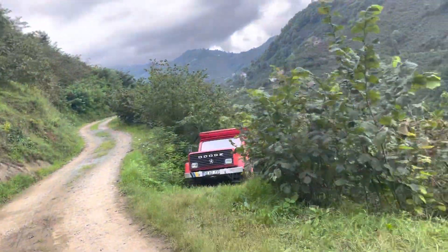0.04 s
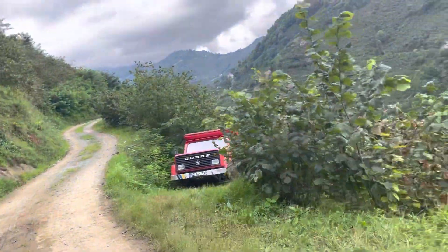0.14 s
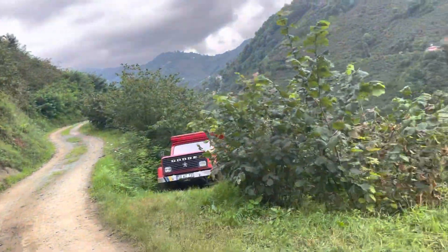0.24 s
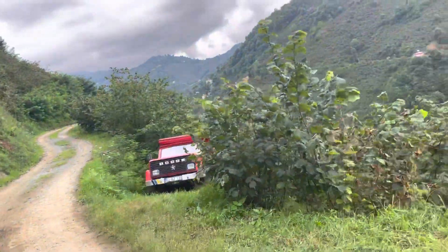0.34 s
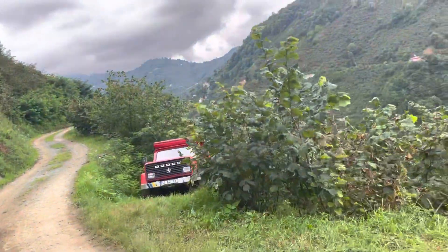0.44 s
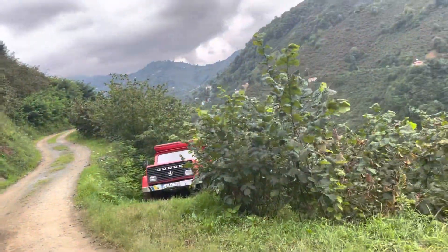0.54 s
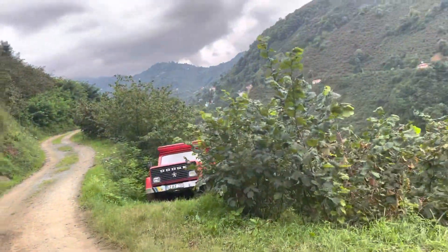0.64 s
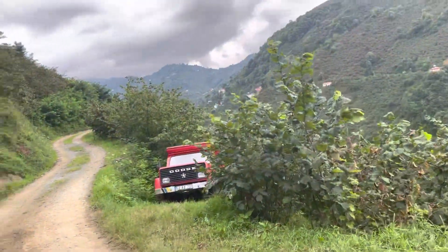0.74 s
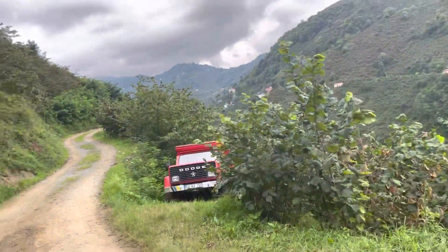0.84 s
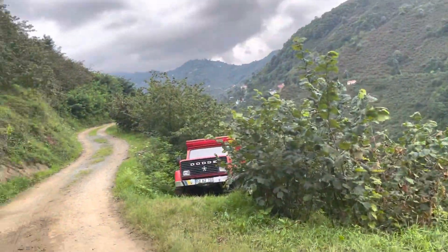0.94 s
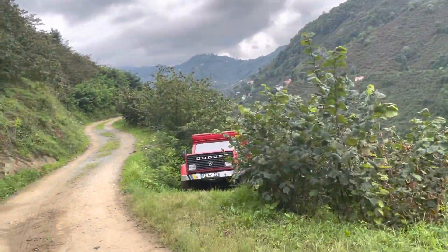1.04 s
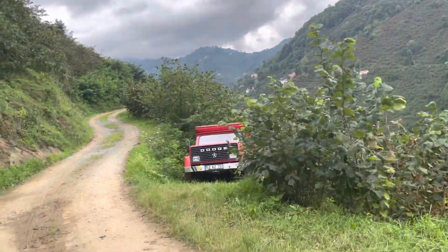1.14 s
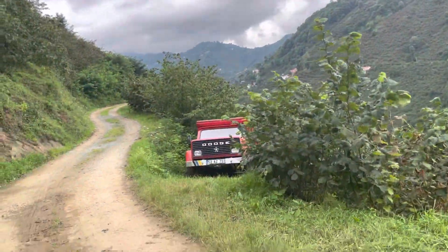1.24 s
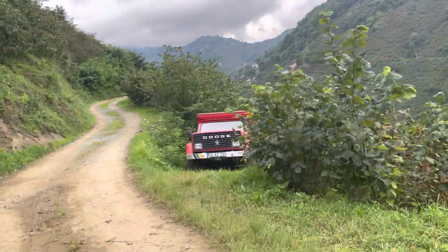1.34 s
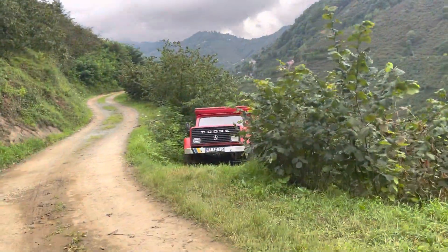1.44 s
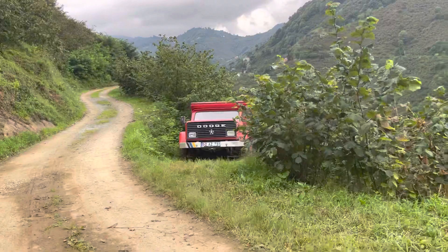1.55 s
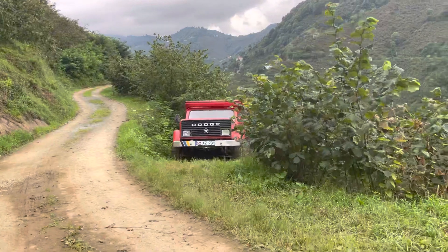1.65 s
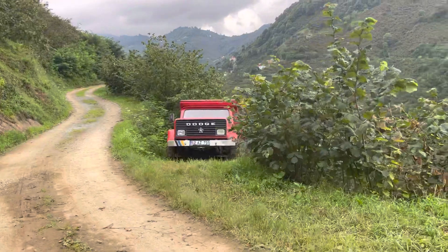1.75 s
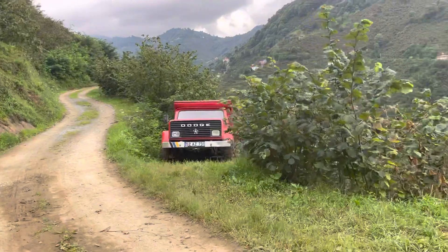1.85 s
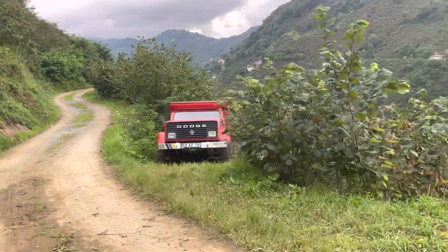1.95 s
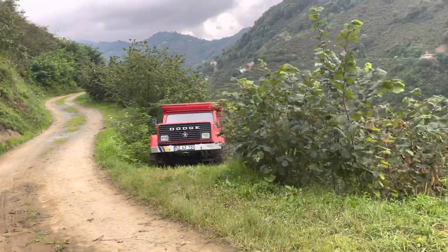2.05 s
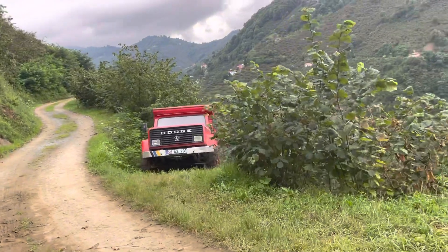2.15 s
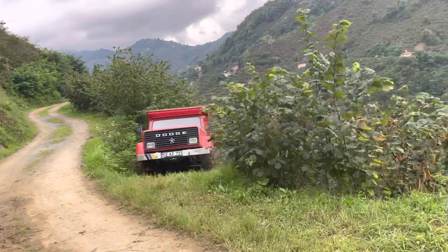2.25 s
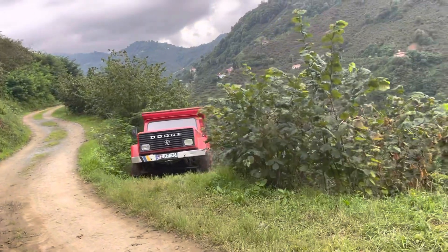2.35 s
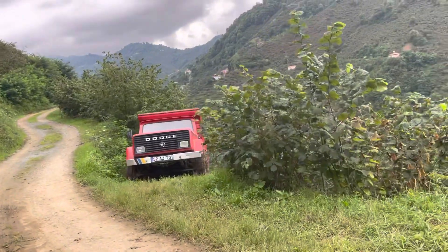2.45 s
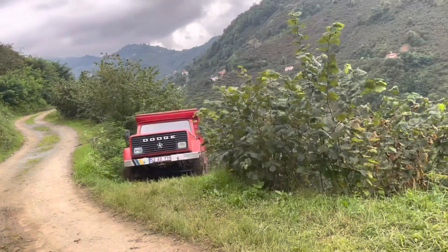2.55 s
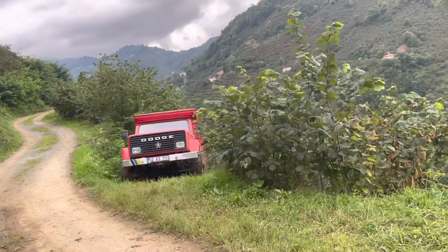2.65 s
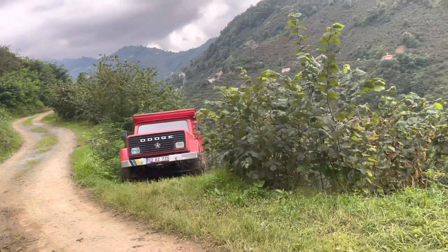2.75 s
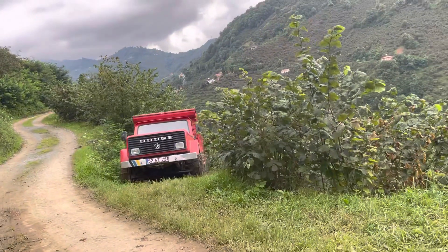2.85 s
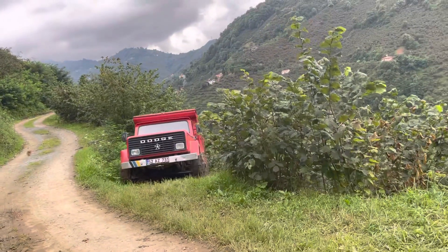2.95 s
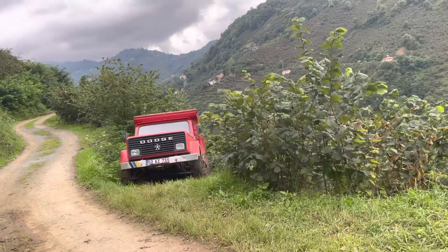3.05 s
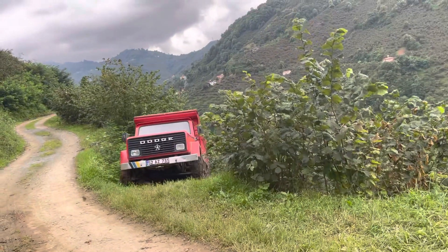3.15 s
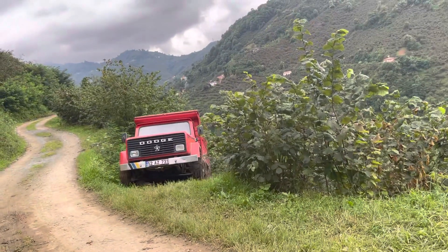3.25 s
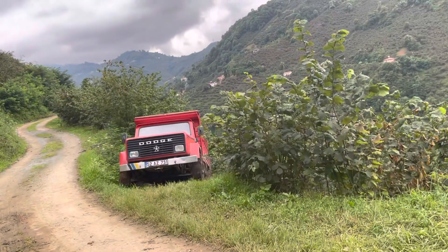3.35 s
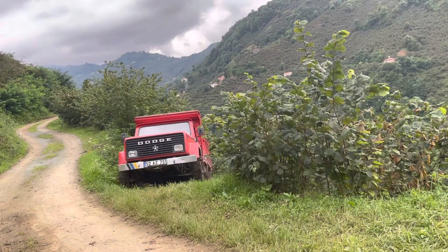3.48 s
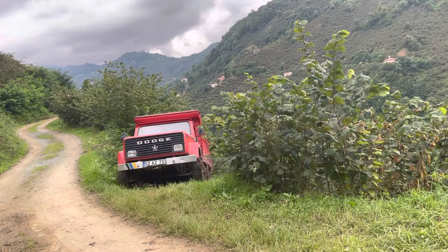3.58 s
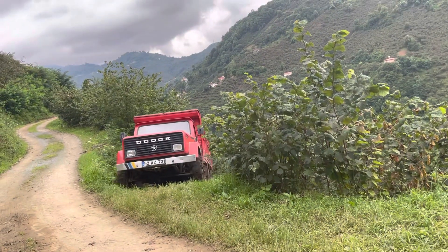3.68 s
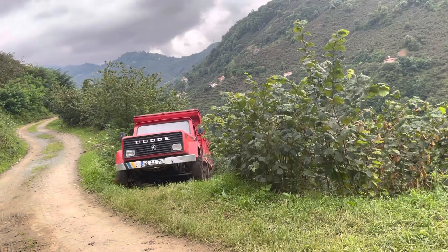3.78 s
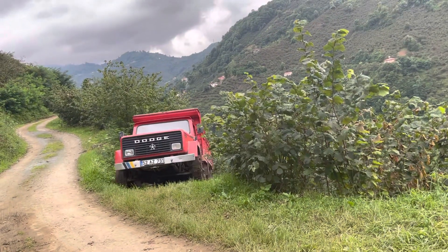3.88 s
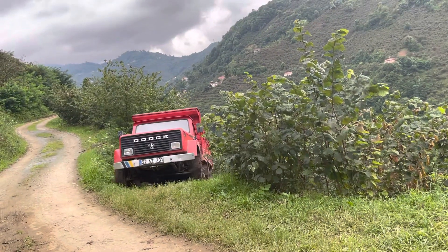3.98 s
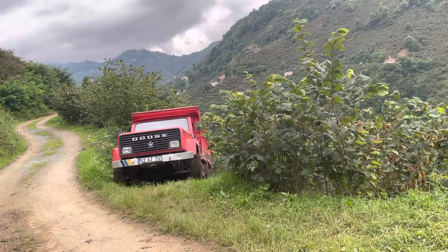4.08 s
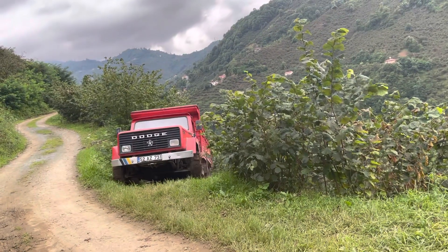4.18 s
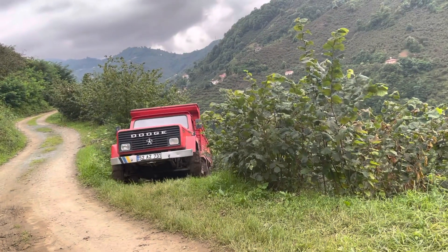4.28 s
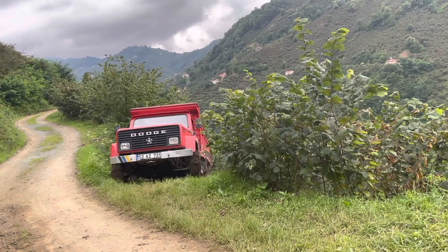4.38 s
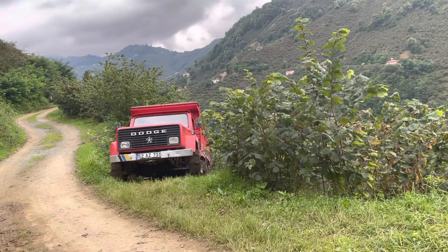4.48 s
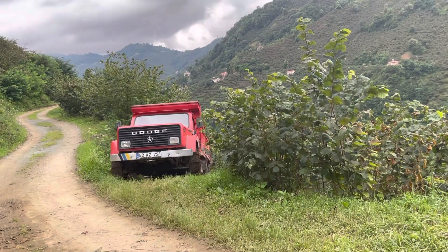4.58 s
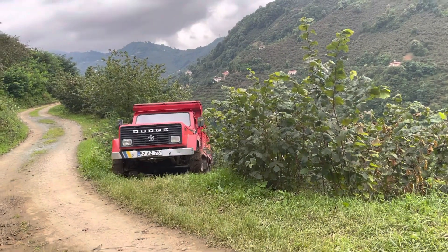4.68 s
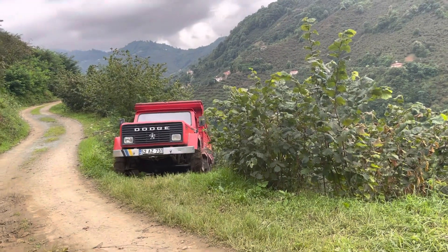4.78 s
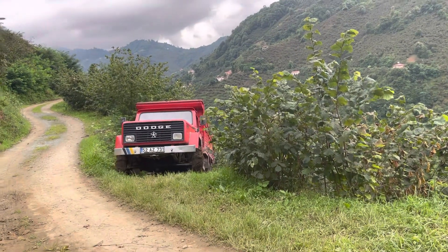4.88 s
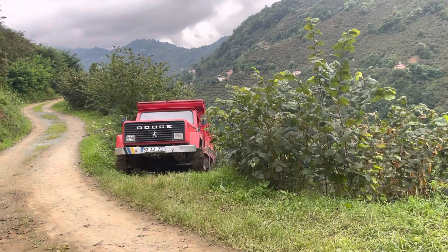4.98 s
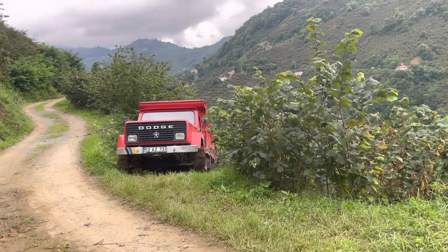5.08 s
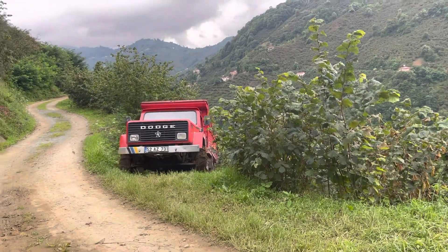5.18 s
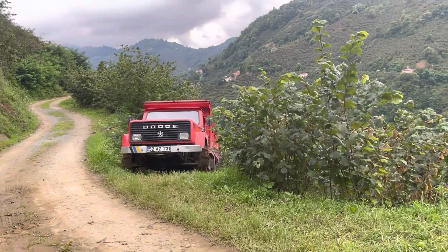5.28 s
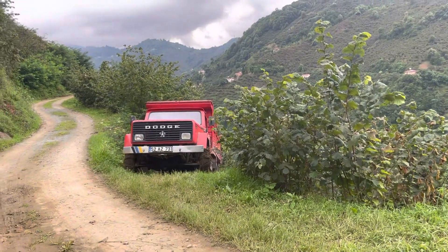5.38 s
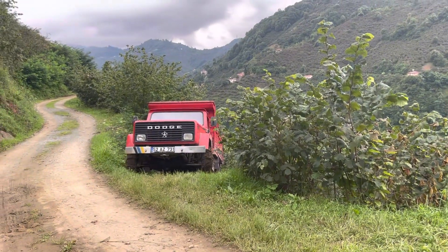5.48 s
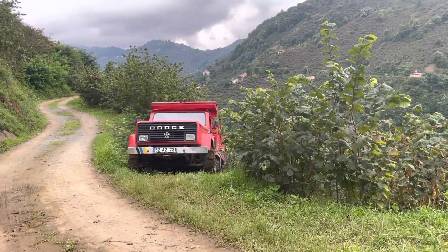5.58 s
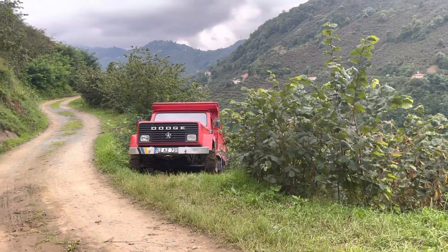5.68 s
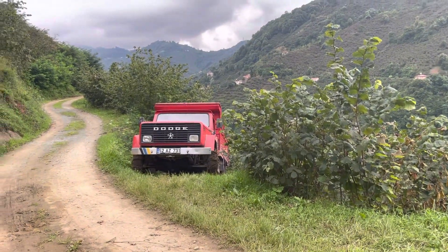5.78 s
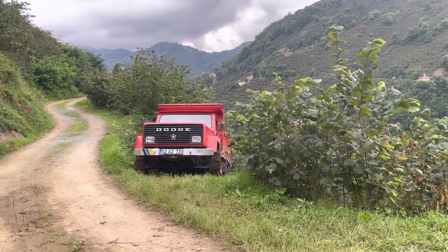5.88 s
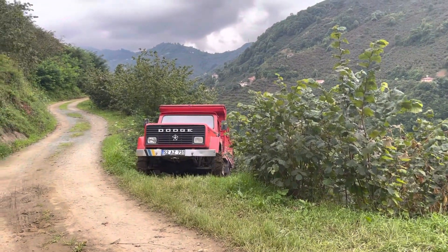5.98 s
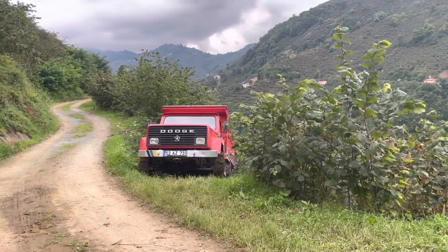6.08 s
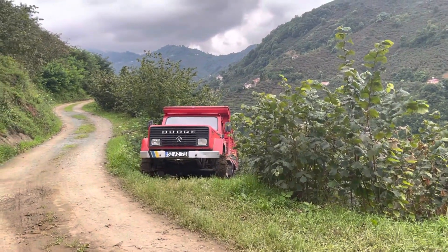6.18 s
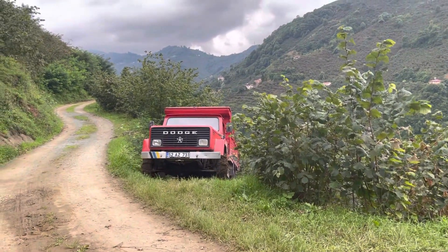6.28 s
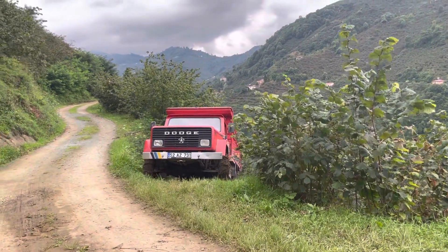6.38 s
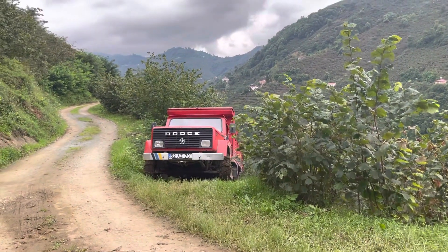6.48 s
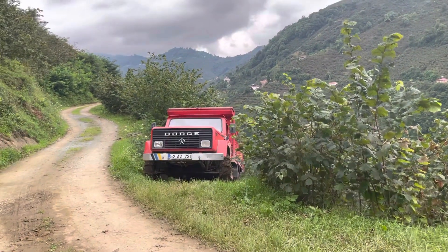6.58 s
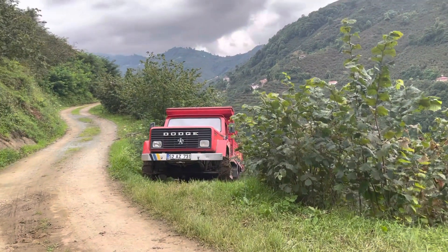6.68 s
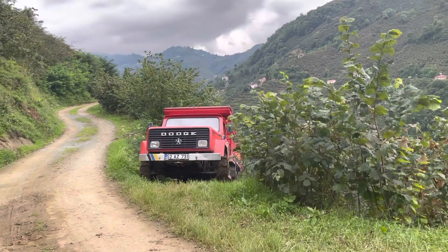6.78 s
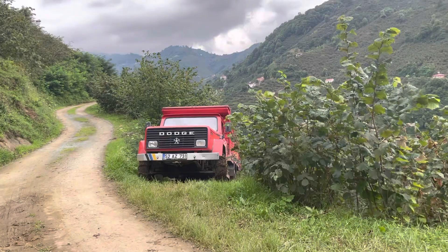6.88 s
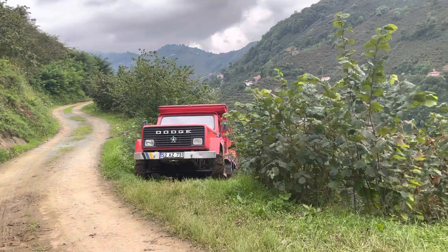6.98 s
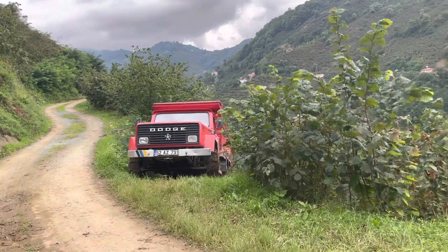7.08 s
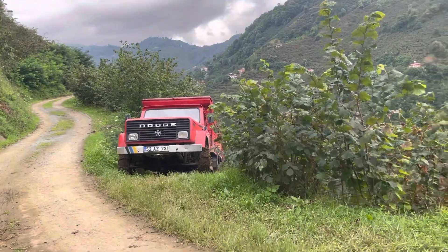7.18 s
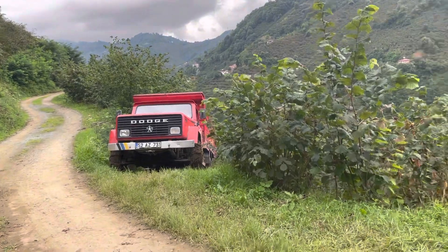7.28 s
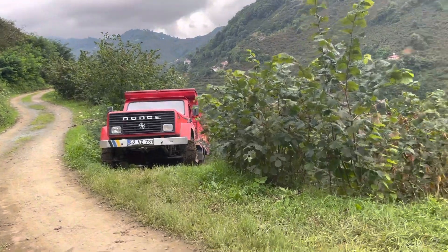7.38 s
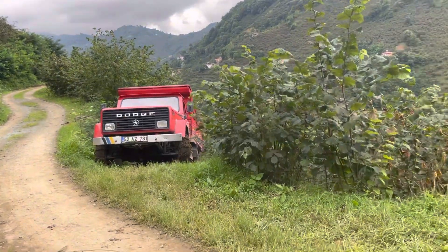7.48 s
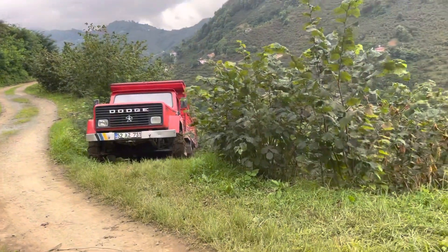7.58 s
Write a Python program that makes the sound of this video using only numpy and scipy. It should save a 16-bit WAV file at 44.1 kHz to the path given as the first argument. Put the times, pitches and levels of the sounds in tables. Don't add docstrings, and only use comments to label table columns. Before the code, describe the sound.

An open-air stereo phone capture, a few metres from an old four-cylinder diesel truck labouring up a grassy slope. From 0 s the engine roars at full pull: booming low exhaust, block rumble, droning panels, valve rattle and turbulent fan hiss. Pitch falls quickly at first, then more slowly, to about half by 4 s. Around 1.2 s there are light steel clanks, a short squeak and a sharp air puff. At 2.2-2.6 s a twig snaps and the chassis thuds repeatedly. At 3.5 s comes a hard metallic bang with a brief plate ring. The combustion knocks grow more distinct as it lugs. Near 4.4 s the engine drops sharply and almost stalls, with clanks, bumps and small squeaks, then recovers by 4.6 s. A quieter, steady, knocking idle continues to 7.6 s, fan hiss slowly fading, with a very faint air puff near the end.

```python
import sys
import numpy as np
from scipy import signal
from scipy.fft import rfft, irfft, next_fast_len
from scipy.io import wavfile
from scipy.ndimage import uniform_filter1d

SR = 44100
rng = np.random.default_rng(int(sys.argv[2]) if len(sys.argv) > 2 else 0)


def to_linear_factor(level_db):
    exponent = np.asarray(level_db, float) / 20
    return 10 ** exponent


def dump_mix(stems):
    frames = np.atleast_2d(stems).T
    limited = np.clip(frames, -1, 1)
    pcm = np.round(limited * 32767).astype(np.int16)
    wavfile.write(sys.argv[1], SR, pcm)


N = 336483


def unit(x):
    return x / np.sqrt(np.mean(x ** 2))


def curves(table):
    s, *columns = np.transpose(table)
    return [np.interp(np.arange(N) / SR, s, c) for c in columns]


def colour(x, points):
    hz, db = np.transpose(points)
    size = next_fast_len(N)
    f = np.maximum(np.fft.rfftfreq(size, 1 / SR), 1)
    gain = to_linear_factor(np.interp(np.log(f), np.log(hz), db, left=-60, right=-60))
    return irfft(rfft(x, size) * gain, size)[:, :N]


def colour_short(x, hz):
    band = signal.butter(2, [hz * 0.58, hz * 1.4], "bandpass", fs=SR, output="sos")
    return unit(signal.sosfilt(band, x))


def ring(x, hz, t60):
    r, w = np.exp(-np.log(1000) / (t60 * SR)), 2 * np.pi * hz / SR
    return signal.lfilter([0, np.sin(w)], [1, -2 * r * np.cos(w), r * r], x)


def noise():
    return rng.standard_normal((2, N))


def walk(rate):
    levels = np.interp(np.arange(N) * rate / SR, np.arange(2000), rng.standard_normal(2000))
    return uniform_filter1d(levels, int(SR / rate / 2))


def add(track, s, sound):
    i = int(s * SR)
    track[:, i:i + sound.shape[-1]] += sound[..., :N - i]


def idling():
    declutch_s = 4.35
    return np.clip((np.arange(N) / SR - declutch_s) / .1 + .5, 0, 1)


def settle(pull_db, idle_db, eases_s, tau_s):
    after = np.maximum(np.arange(N) / SR - eases_s, 0)
    return idle_db + (pull_db - idle_db) * np.exp(-after / max(tau_s, .02))


def struck(since, late):
    return np.diff((since > late) * 1., prepend=1) > 0


# start in seconds, peak in dB, centre in Hz, length in seconds.
THUDS = [(1.685, -23, 364.4, 0.025), (2.269, -25.5, 480, 0.064), (2.304, -15.5, 620, 0.018),
         (2.321, -21, 353, 0.011), (2.424, -23, 210, 0.028), (2.474, -21.5, 335, 0.037),
         (2.516, -17, 505, 0.038), (2.552, -34, 638, 0.034), (3.49, -14, 360, 0.041),
         (3.536, -16.5, 198, 0.022), (4.008, -24, 242, 0.022), (4.48, -21.5, 560, 0.017),
         (4.994, -31, 470, 0.041), (4.438, -24, 150, .05), (4.6, -28, 150, 0.072)]
# start in seconds, peak in dB, pitch in Hz.
TWIG_SNAPS = [
    (2.243, -6.5, 1580),
]


def thuds():
    out = np.zeros((2, N))
    t = np.arange(SR // 5) / SR
    for s, db, hz, length in THUDS:
        shape = (t / length) * np.exp(1 - 3 * t / length) * 3
        bump = colour_short(rng.standard_normal((2, len(t))), hz)
        add(out, s, to_linear_factor(db - 5.5) * shape * bump)
    for s, db, hz in TWIG_SNAPS:
        pulse = np.exp(-((t - .0012) / 0.00064) ** 2) * np.sin(2 * np.pi * hz * t)
        add(out, s, to_linear_factor(db) * pulse * np.ones((2, 1)))
    return out


# start in seconds, peak in dB, crack in dB, tail in seconds.
CLANKS = [(1.1694, -19.5, -32, 0.061), (1.199, -16.5, -24.5, 0.015), (2.436, -31, -4, 0.015),
          (2.7123, -25, -10, 0.03), (3.2197, -24, -7, 0.018), (3.4896, -0.5, -21, 0.039),
          (3.622, -22, -12, 0.11), (3.8228, -22.5, -28, 0.018), (4.103, -17, -14.5, 0.091),
          (4.264, -16.5, -16, 0.078), (4.4374, -25, -5.5, 0.024), (4.5965, -15.5, -30, 0.075),
          (4.8045, -27, -15, 0.09)]


def steel_cracks():
    low, high = np.zeros((2, 2, N))
    t = np.arange(SR // 8) / SR
    for s, db, crack_db, tail in CLANKS:
        decay = 0.7 * np.exp(-t / 0.0094) + .5 * np.exp(-t / max(tail, .004))
        shape = (1 - np.exp(-t / 0.00024)) * decay
        add(low, s, to_linear_factor(db - 17.5) * shape * rng.standard_normal((2, len(t))))
        add(high, s, to_linear_factor(db + crack_db) * shape * rng.standard_normal((2, len(t))))
    body = colour(low, [(500, -6), (1800, 10.5), (4000, 5.0), (7500, -8)])
    return body + colour(high, [(5000, -10), (8000, 1), (12000, 5), (13800, -15)])


# frequency in Hz, level in dB, 60 dB decay in seconds.
PLATE_MODES = [(2300, -3, .06), (2490, -7, .24), (3400, 0, .19), (3455, -4, .17), (4170, -9, .14),
               (5216, -2, .09)]
# start in seconds, blow in dB.
STRIKES = [
    (3.488, -45),
    (3.498, -23),
]


def steel_plates():
    blow = np.zeros((2, N))
    for s, db in STRIKES:
        add(blow, s, to_linear_factor(db) * np.ones((2, 1)))
    return sum(to_linear_factor(db) * ring(blow, f, t60) for f, db, t60 in PLATE_MODES)


# start in seconds, start in Hz, end in Hz, length in seconds, level in dB.
SQUEAKS = [
    (1.21, 3400, 3390, 0.055, -41),
    (3.204, 2810, 2860, 0.056, -40),
    (3.62, 3330, 3420, 0.074, -39),
    (4.077, 3050, 3330, 0.037, -38),
    (4.108, 3480, 3480, 0.027, -36),
    (4.595, 2200, 2230, .03, -41),
    (5.643, 6300, 6340, 0.042, -50),
]


def squeaks():
    out = np.zeros((2, N))
    t = np.arange(SR // 8) / SR
    for s, start_hz, end_hz, length, db in SQUEAKS:
        part = np.clip(t / length, 0, 1)
        chatter = 1 + 0.59 * unit(uniform_filter1d(rng.standard_normal((2, len(t))), size=80))
        angle = 2 * np.pi * np.cumsum(start_hz + (end_hz - start_hz) * part) / SR
        add(out, s, to_linear_factor(db) * np.sqrt(np.abs(np.sin(np.pi * part))) * chatter * np.sin(angle))
    return out


# centre in seconds,
# level in dB, length in seconds.
PUFFS = [
    (1.206, -38, .04),
    (7.464, -53, .12),
]
# frequency in Hz, level in dB per Hz.
PUFF_SPECTRUM = [(2500, -12), (4200, -7), (5600, -8), (11000, -6), (13800, -22)]


def air_puffs():
    t = np.arange(N) / SR
    puffs = sum(to_linear_factor(db) * np.exp(-((t - s) / length) ** 2) for s, db, length in PUFFS)
    return puffs * unit(colour(noise(), PUFF_SPECTRUM))


# frequency in Hz, level in dB per Hz.
FAN_SPECTRUM = [(1500, -3), (4000, -25), (5600, -12.5), (6700, 5), (7500, 1), (9000, 2), (11500, 1),
                (12600, -7), (13800, -7)]


def fan(knock, hz):
    level_db = settle(pull_db=-52.5, idle_db=-81.5, eases_s=3.5, tau_s=4.8) + 0.1459 * (hz - 31)
    flutter_db = 8.5 + 2.6 * walk(25) + 1.84 * walk(11.0)
    return to_linear_factor(level_db + flutter_db) * unit(colour(noise() * (1 + 2.0 * knock), FAN_SPECTRUM))


# frequency in Hz, level in dB per Hz.
RUMBLE_SPECTRUM = [(40, 5), (100, 0), (200, 0.5), (330, -1.5), (500, -5.5), (800, -11), (1200, -23),
                   (2000, -28)]


def rumble(turns, revs):
    level_db = settle(pull_db=-31.5, idle_db=-40.5, eases_s=4.5, tau_s=0.58) + 0.1464 * revs
    throb = 1 + 0.043 * np.cos(2 * np.pi * (turns - .15))
    roar = unit(colour(noise() * throb * to_linear_factor(0.88 * walk(18)), RUMBLE_SPECTRUM))
    return to_linear_factor(level_db - 1.64) * roar


# frequency in Hz, width in Hz, level in dB.
PANELS = [(398.8, 18, 4.5), (310, 20, -22), (704, 17, -13.5), (930, 17, -12), (2000, 280, -12),
          (2420, 190, -15.5)]


def panel_drone(firing, since, revs):
    full_hz = 18.7
    level_db = settle(pull_db=-40.5, idle_db=-49.5, eases_s=4.1, tau_s=.1) + 0.6023 * np.minimum(revs, full_hz)
    chance = rng.standard_normal((700, 2))
    late = .002 + .00022 * np.clip(chance[firing, 0], -3, 3)
    kicks = unit(struck(since, late) * to_linear_factor(chance[firing, 1] + 9.4 * (firing % 2)))
    modes = [to_linear_factor(db) * unit(ring(kicks + f / 2200 * noise(), f, 2.2 / width)) for f, width, db in PANELS]
    return to_linear_factor(level_db - 2.0) * unit(sum(modes))


# frequency in Hz, level in dB per Hz.
GEAR_SPECTRUM = [(300, -3), (600, -4.5), (1300, -2.5), (1600, -0.5), (1850, -1), (2300, -5), (3000, -7.5),
                 (4200, -10), (4700, -13.5), (5600, -15.5), (6600, -17.5), (8000, -15.5), (12000, -23.5),
                 (13800, -38)]
# frequency in Hz, width in Hz, level in dB.
COVERS = [(724.5, 11, -12), (1423, 86, -9), (1244, 82, -19), (1634, 53, -11)]


def valve_gear():
    rattle = noise() * to_linear_factor(1.73 * walk(40))
    covers = sum(to_linear_factor(db) * unit(ring(rattle, f, 2.8 / width)) for f, width, db in COVERS)
    return unit(colour(rattle, GEAR_SPECTRUM)) + covers


# level in dB, in firing order.
CYLINDER_DB = [0, .9, -.7, 0]


def combustion(firing, since):
    size = to_linear_factor(.8 * rng.standard_normal(700)[firing] + np.array(CYLINDER_DB)[firing % 4])
    burst = unit(size * (1 - np.exp(-since / 0.005)) ** 2 * np.exp(-since / 0.0062))
    return size, burst


# frequency in Hz, level pulling in dB,
# level idling in dB, 60 dB decay in seconds.
BLOCK_MODES = [(694, 5.5, -5, 0.15), (1150, -28, -12.5, 0.028), (1394, 9.5, 6.5, 0.04),
               (2499, 4, -12.5, 0.05), (2956, -3, 0.5, 0.093), (3220, -2, -33, 0.025),
               (3480, -17, -1, 0.076), (3800, -15, -1.5, 0.05), (4175, -27, 4, 0.026),
               (5300, -24, -13, 0.034)]


def block_rings(firing, since, size, burst, hz):
    level_chance, sign_chance = rng.standard_normal((2, 700, len(BLOCK_MODES)))
    lug_db = .8 * np.maximum(26 - hz, 0)
    shake = struck(since, .005) * size + 0.097 * burst * noise()
    idle = idling() * (hz > 25)
    out = 0
    for k, (f, pull_db, idle_db, t60) in enumerate(BLOCK_MODES):
        level_db = pull_db + lug_db * (f > 2000) + idle * (idle_db - pull_db)
        level_db = level_db + 2.3 * level_chance[firing, k]
        out = out + ring(shake * to_linear_factor(level_db) * np.sign(sign_chance[firing, k]), f, t60)
    return unit(out)


# frequency in Hz, level in dB per Hz.
KNOCK_SPECTRUM = [(400, -2), (1200, 2.5), (1900, -2.5), (2500, -1), (3200, -0.5), (4200, -6.5), (4800, -9),
                  (5600, -13.5), (8000, -10.5), (12000, -16), (13800, -31)]
# time in seconds, level in dB.
NEAR = [(0, -0.5), (1, -3), (2.1, 0.5), (3.3, 1), (4.1, 0), (7.63, 2.5)]


def clatter(firing, since, hz, size, burst, share):
    near_db, = curves(NEAR)
    level_db = settle(pull_db=-33.5, idle_db=-37.5, eases_s=4, tau_s=0.42) + near_db
    knock = unit(colour(noise() * burst, KNOCK_SPECTRUM))
    knock = knock + 1.02 * block_rings(firing, since, size, burst, hz)
    return to_linear_factor(level_db + 1.0) * ((1 - share) * 1.085 * valve_gear() + share * knock)


# time in seconds, level in dB.
FUEL = [(0, 0), (.8, 0), (1.6, -0.5), (2.4, -0.5), (3.4, -0.5), (3.8, -5), (4.07, -2.5), (4.16, -3.5),
        (4.28, -6), (4.38, -38), (4.5, -5), (4.56, -2.5), (4.63, -15), (4.7, -7), (4.78, -11.5),
        (4.95, -11.5), (7.3, -11), (7.63, -10)]
# frequency in Hz, level in dB.
PIPE = [(20, -50), (40, -19.5), (56, 3.5), (72, -5), (88, -7), (106, -3.5), (135, -11), (170, -25.5)]
# level at full fuel in dB, share of the fuel change followed (0-1 or more),
# rise in dB per Hz of speed, extra at idle in dB.
ORDERS_DB = [(-17, 0.3, -0.07, 6), (-20.5, 1.33, 0.0033, 2.2), (-25, .5, -0.156, -5),
             (-28, 0.8, -2.7, -8.5)]
PULSE = [(1, -1.3, np.pi), (2, -1.4, .2), (3, 1.5, 1.3), (4, 2.5, -1.5)]
# multiple of the firing rate, level under order 3 in dB.
UPPER = [(5, -14), (6, -20), (7, -21.5), (9, -16)]


def exhaust(turns, hz):
    fuel_db, = curves(FUEL)
    pipe_hz, pipe_db = np.transpose(PIPE)
    free = idling()
    dbs = []
    for order, (db, follows, db_per_hz, idle_db) in enumerate(ORDERS_DB, 1):
        load_db = follows * fuel_db + db_per_hz * np.maximum(hz - 29, 0) + idle_db * free
        dbs.append(db + load_db + np.interp(np.log(order * hz), np.log(pipe_hz), pipe_db))
    out = 0
    for db, (k, pulling, idle) in zip(dbs, PULSE):
        slip = (k == 1) * .065 * (35 - hz)
        angle = k * 2 * np.pi * turns + (1 - free) * (pulling + slip) + free * idle
        out = out + to_linear_factor(db + .5 * k * walk(16)) * np.cos(angle + 0.11 * k * walk(18))
    for k, db in UPPER:
        out = out + to_linear_factor(dbs[2] + db + 5.1 * walk(12)) * np.cos(k * 2 * np.pi * turns + 0.87 * walk(7.6))
    return np.sqrt(2) * out


# time in seconds, rate in firings a second.
SPEED = [(0.0, 56.3), (0.45, 51.54), (0.89, 47.71), (1.54, 42.86), (1.68, 39.7), (1.94, 41.87),
         (2.26, 40.68), (2.51, 36.09), (2.72, 36.16), (2.84, 35.2), (3.44, 33.89), (3.64, 30.3),
         (4.03, 28.23), (4.35, 20.41), (4.52, 23.34), (4.6, 26.95), (5.64, 26.74), (7.63, 26.84)]


def scene():
    hz, = curves(SPEED)
    revs = hz - 27
    turns = np.cumsum(hz) / SR + .62
    fired = turns + .24 + .02 * np.maximum(revs, 0)
    firing = fired.astype(int)
    since = (fired - firing) / hz
    size, burst = combustion(firing, since)
    share = np.clip(0.47 - 0.013 * revs, 0, 1)
    out = thuds() + steel_cracks() + steel_plates() + squeaks()
    out = out + air_puffs() + fan(burst * share, hz)
    out = out + rumble(fired, revs) + panel_drone(firing, since, revs)
    return out + clatter(firing, since, hz, size, burst, share) + exhaust(turns, hz)


def gate_bands(ports):
    sums = [ports.sum(0) / 2, (ports[0] - ports[1]) / 2]
    f, s, (mid, side) = signal.stft(sums, SR, nperseg=2048, noverlap=1024)
    frames = mid.shape[1]
    held = np.cumsum(rng.random(frames) < .45)
    low = rng.choice([7400, 7700, 8300], frames, p=[.4, .5, .1])[held]
    high = rng.choice([8900, 9250, 9600], frames, p=[.2, .2, .6])[held]
    top = rng.choice([13100, 13500, 13850], frames, p=[.55, .3, .15])[held]
    slim = (s < 1.85) & (rng.random(frames)[held] < .45)
    low, high = np.where(slim, 8300, low), np.where(slim, 8900, high)
    shut = rng.random(frames) > .03
    treble = np.abs(mid[f > 9600]).mean(0) + 1e-9
    shut &= treble < to_linear_factor(4.6) * np.roll(treble, 1)
    f = f[:, None]
    mid = mid * ~((f > low) & (f < high) & shut | (f > top))
    side = side * (f < 12400)
    mid, side = signal.istft([mid, side], SR, nperseg=2048, noverlap=1024)[1][:, :N]
    return np.array([mid + side, mid - side])


def top_cut(x):
    return signal.sosfilt(signal.butter(12, 13870, fs=SR, output="sos"), x)


# frequency in Hz,
# lag of the right port in radians, likeness 0-1, left minus right in dB.
PORTS = [(0, 0, 1, -0.6), (150, 0.25, 0.95, -0.2), (427, 0.69, 1, -0.5), (930, 1.39, 0.95, 5),
         (1545, 2, 0.64, 1.5), (1562, 3.5, 0.64, 1), (2590, 7, 0.89, 1), (3030, 7, 0.71, 1.5),
         (4420, 7, 0.6, 1.5), (5660, 7, 0.44, 7), (5620, 3, 0.2, -2), (7040, 8.5, 0.46, 2),
         (7070, 4.5, 0, 8),
         (7600, np.pi, .9, 0), (8300, np.pi, .96, 0), (8900, np.pi, .96, 0), (9500, 2.7, .9, 0),
             (9900, 2.3, .85, 0), (12200, .9, .82, 0), (12600, 0, 1, 0), (22050, 0, 1, 0)]


def record(dry):
    hz, lag, like, pan_db = np.transpose(PORTS)
    f = np.fft.rfftfreq(N, 1 / SR)
    like = np.clip(np.interp(f, hz, like), 0, 1)
    tilt = to_linear_factor(np.interp(f, hz, pan_db) / 2)
    direct, scatter = rfft(dry)
    right = like * direct + np.sqrt(1 - like ** 2) * scatter
    right = right * np.exp(-1j * np.interp(f, hz, lag))
    ports = irfft(np.array([direct * tilt, right / tilt]), N)
    mix = gate_bands(.85 * np.tanh(ports / .85))
    return top_cut(mix)


dry = scene()
out = record(dry)
dump_mix(out)
```